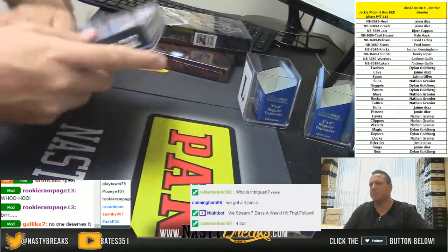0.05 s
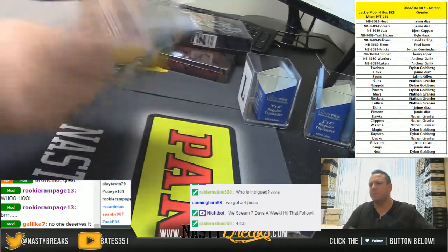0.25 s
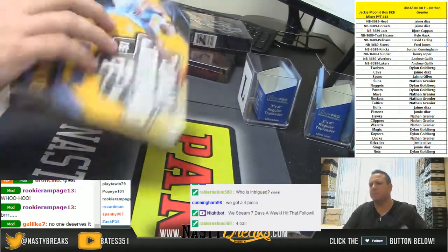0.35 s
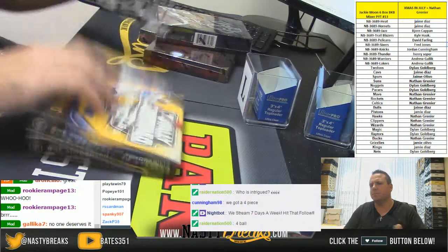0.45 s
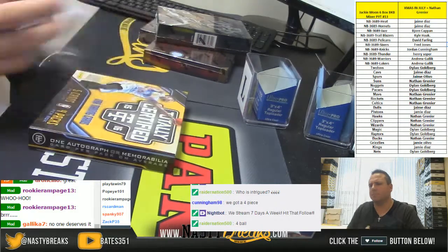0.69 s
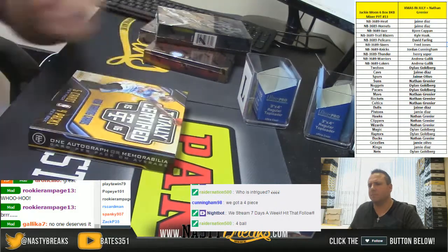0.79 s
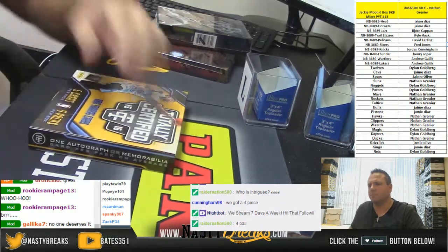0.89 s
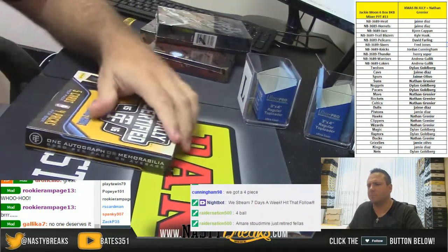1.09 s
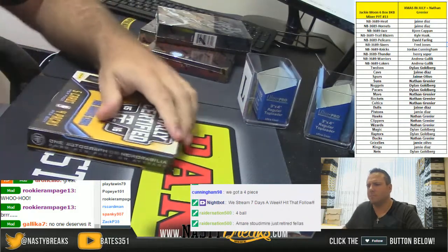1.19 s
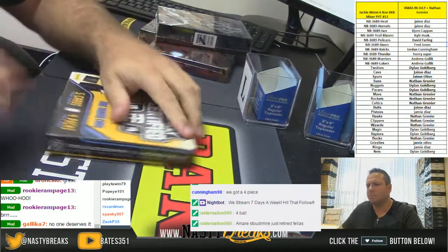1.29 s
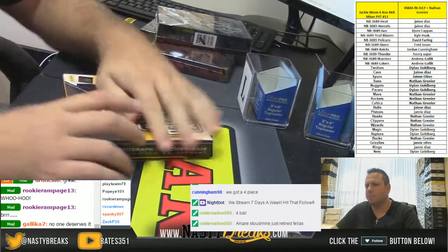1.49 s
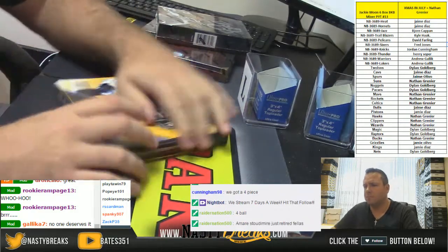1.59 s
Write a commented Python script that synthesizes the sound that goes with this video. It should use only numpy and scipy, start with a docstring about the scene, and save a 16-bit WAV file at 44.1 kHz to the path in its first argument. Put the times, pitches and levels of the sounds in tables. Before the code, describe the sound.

A flat cardboard box slaps onto a desk with a loud, overloaded thunk after brief wrap crackles and a faint whoosh; then hands rub, shuffle and tap it softly over a low machine hum, close microphone.

```python
"""A machine hums in a room while hands slide over a glossy box lid: hissing noise, with snaps of the wrap.
A hollow whoosh swells as the flat cardboard box swings down. A quarter of a second in, it slaps onto
a desk: ringing walls and cracks of noise overload the microphone, and the desk top booms in low tones.
Then hands nudge, shuffle and tap the box: soft low thumps, dull noise and very short tones.
A thin high hiss comes up near the end."""
import sys
import numpy as np
from scipy import signal
from scipy.fft import rfft, irfft
from scipy.io import wavfile

SR = 44100
rng = np.random.default_rng(int(sys.argv[2]) if len(sys.argv) > 2 else 0)


def field_ratio(decibels):
    """Amplitude ratio for a level in dB (20 dB per decade); scalars and array-likes work."""
    return 10 ** (np.asarray(decibels, dtype=float) / 20)


def transcribe(signal):
    """Save signal, clipped to [-1, 1], as a 16-bit WAV file at the path in sys.argv[1]."""
    frames = np.atleast_2d(signal).T
    limited = np.clip(frames, -1, 1)
    pcm = np.round(limited * 32767).astype(np.int16)
    wavfile.write(sys.argv[1], SR, pcm)


N = 72765   # length in samples

# machine hum that wavers, in four stretches of rows: [t/s, level/dB]
HUM_LEVEL = [
    [(0.0, -38.5), (0.076, -37.5), (0.162, -53), (0.22, -35.5)],
    [(0.45, -40), (0.518, -37.5), (0.67, -48), (0.76, -37.5)],
    [(1.0, -38.5), (1.098, -41.5), (1.144, -58), (1.19, -46)],
    [(1.36, -45), (1.388, -67), (1.426, -40.5), (1.64, -53.5)],
]
# loudness of a thin high hiss: [t/s, level/dB]
THIN_HISS_LEVEL = [(1.40, -72), (1.47, -80), (1.555, -59.5), (1.60, -67.5), (1.63, -78)]
# tone colour of the room air: [f/Hz, relative level per Hz/dB]
AIR_COLOUR = [(88, -16), (150, -3.5), (308, -16), (441, -14), (542, -22), (1390, -28.5), (1960, -33),
              (7980, -37.5), (9000, -40.5), (11700, -65.5), (19800, -120)]
# how long the room echoes at each pitch: [f/Hz, time to fall by 60 dB/s]
ROOM_DECAY = [(300, 0.22), (1000, 0.22), (3000, 0.22), (8000, 0.13), (16000, .2)]
# hollow note as the box swings down: [t/s, level/dB]
WHOOSH_LEVEL = [(.09, -55.5), (.125, -47), (.19, -48), (.225, -53.5), (.24, -64.5)]
# skin sliding on the wrap: [t/s, level/dB]
RUB_LEVEL = [(0, -50), (.035, -47), (.09, -49.5), (.15, -42.5), (.19, -48.5), (.232, -55), (.30, -49),
             (.374, -54.5), (.384, -38.5), (.412, -47), (.44, -32), (.495, -36), (.555, -39), (.578, -47.5),
             (.625, -51), (.66, -58), (.70, -56), (.715, -46.5), (.79, -51.5), (.82, -60.5), (.90, -65.5),
             (.98, -78), (1.06, -67.5), (1.11, -57), (1.17, -58.5), (1.22, -62.5), (1.31, -69),
             (1.35, -52.5), (1.40, -56.5), (1.46, -61), (1.53, -55), (1.59, -55), (1.63, -70)]
# tone colour of the sliding skin: [f/Hz, relative level per Hz/dB]
SKIN_COLOUR = [(290, -31), (500, -3), (1000, -8), (1090, -10.5), (1320, -2.5), (3140, -4), (6380, -2),
               (10400, -8.5), (14600, -10), (15900, -14.5)]
# palms shuffling the box on the mat: [t/s, level/dB]
SHUFFLE_LEVEL = [(0, -50.5), (.2, -49), (.40, -45), (.52, -44.5), (.60, -58), (.76, -58), (.785, -42.5),
                 (.83, -49.5), (.97, -55.5), (1.03, -60), (1.18, -61), (1.24, -53.5), (1.36, -51),
                 (1.46, -62), (1.52, -48.5), (1.58, -54), (1.65, -46)]
# tone colour of the shuffling: [f/Hz, relative level per Hz/dB]
MAT_COLOUR = [(180, -3), (300, -2.5), (833, -15), (1480, -12.5), (1940, -24.5), (3000, -19), (3900, -45.5),
              (6600, -120)]
# finger taps and small creaks on the lid:
# [t/s, level/dB, f/Hz, upper ring relative level/dB, lower ring relative level/dB]
FINGER_TAPS = [(0.028, -42.5, 1490, -5, 3), (0.71, -40, 2300, 2, 0.5), (0.777, -39.5, 1000, -16, 7),
               (0.785, -45.5, 1150, 5.5, -16), (0.872, -53.5, 802, 5, -20), (0.885, -40.5, 1000, -8, -16),
               (0.952, -50, 1380, -4, -11), (1.15, -45.5, 1217, -8, -7.5), (1.18, -39, 1015, -11.5, -29.5),
               (1.261, -51.5, 787, -2, 6), (1.272, -32.5, 1885, -15.5, -1.5), (1.311, -40.5, 977, -15, -13),
               (1.428, -44, 1370, -10, -6), (1.491, -46.5, 1590, -9, -8), (1.512, -46.5, 1170, -4, -13),
               (1.557, -44, 1390, -1.5, -5), (1.603, -49, 1060, -9, -13)]
# duller pats, same columns:
# [t/s, level/dB, f/Hz, upper ring relative level/dB, lower ring relative level/dB]
DULL_PATS = [(0.068, -47, 320, -15, -14), (0.777, -30.5, 490, -10.5, -16), (0.799, -51, 369, 7, -14),
             (0.845, -39, 400, -14, -13.5), (0.91, -53, 363, 6, -20), (0.957, -40, 475, -14, -25),
             (0.974, -37.5, 326, -15, -16), (1.357, -38, 446, -8.5, -17), (1.497, -37, 430, -10, -12),
             (1.518, -39.5, 346, -1.5, -19)]
# plastic wrap snapping, same columns:
# [t/s, level/dB, f/Hz, upper ring relative level/dB, lower ring relative level/dB]
WRAP_SNAPS = [(0.0377, -28, 8300, -5, -1), (0.095, -33, 5040, -5, -5), (0.1128, -35, 4140, -2, -5),
              (0.1256, -24.5, 7850, -3, -5.5), (0.365, -36.5, 6250, -4, -17),
              (0.3827, -28.5, 4590, -12, -2), (0.4378, -21, 7240, -3, -20), (0.4457, -20, 6720, -1, -21),
              (0.4701, -21.5, 8100, -3, -12), (0.6871, -37, 7700, -9, -7), (0.8841, -41, 3520, -0.5, 1),
              (1.272, -38, 3700, -5, 1), (1.491, -47, 7690, -7, -5), (1.513, -44, 4900, -5, -3),
              (1.5574, -44, 8250, 0.5, -9)]
# tones of the desk top and frame: [f/Hz, time to fall by 60 dB/s]
DESK_MODES = [(47, 0.41), (72, 0.14), (148, 0.3), (168, 0.14), (186, 0.18)]
# pushes into the desk: [t/s, then level/dB into each of the four lowest desk tones]
DESK_PUSHES = [(.250, -14.5, -4, -9.5, -2), (.268, -8.5, -15.5, 3, 3.5), (.292, -54, -8, -7, 0),
               (0.401, -28, -24.5, -35.5, -34), (0.502, -25, -44, -44, -41),
               (0.778, -13.5, -12.5, -19, -36), (.845, -13.5, -15.5, -37, -18.5),
               (.875, -10.5, -19.5, -24.5, -29), (0.989, -39, -44, -44, -30),
               (1.205, -24.5, -22, -15.5, -8.5), (1.239, -19, -33, -35, -18), (1.286, -18, -39, -56, -28.5),
               (1.371, -32, -45, -47, -33.5), (1.50, -26.5, -55, -36.5, -28.5),
               (1.550, -22.5, -20.5, -33, -29.5), (1.601, -19.5, -41, -54, -32.5)]
# desk shaken by resting hands: [t/s, level/dB]
SHAKE_LEVEL = [(0.0, -41), (0.242, -46.5), (0.41, -33.5), (0.606, -39.5), (0.78, -30.5), (0.94, -27.5),
               (1.064, -36), (1.314, -34.5), (1.466, -32.5), (1.64, -54)]
# edges and face of the box landing: [t/s, level/dB, crack level/dB, f/Hz of the wall tones struck most]
LANDINGS = [(.2413, -3, -20, 596), (0.2429, -1, -13, 620), (0.2503, 1, -6.5, 1360), (.2530, -3, -7, 650),
            (.2590, -8, -26, 550), (0.2649, -0.5, -2.5, 1200), (.2690, 4.5, -8.5, 445),
            (0.2774, -3.5, -19.5, 1084), (.2840, -17, -23, 893)]
# tones of the box walls: [f/Hz, relative level/dB, time to fall by 60 dB/s]
BOX_MODES = [(288.5, -5.5, 0.092), (355, -9.5, 0.031), (425, -9, 0.076), (509, -6, 0.025), (580, -7, 0.072),
             (695, -7.5, 0.029), (790, -13, 0.033), (994, -6.5, 0.02), (1200, -11.5, 0.018),
             (1483, -7.5, 0.019), (1865, -14, 0.02), (2176, -12.5, 0.033), (2478, -11.5, 0.015),
             (2780, -16, 0.015), (3700, -22, 0.012)]
# tone colour of the air squeezed out: [f/Hz, relative level per Hz/dB]
CRACK_COLOUR = [(180, -34), (300, -2), (440, 5), (868, -13), (1230, -2), (1890, -15.5), (5580, -23),
                (15900, -47.5)]

HUM_HZ, AIR_DB, ROOM_DB = 120.4, -52.5, -10.5
WHOOSH_HZ, WHOOSH_T60_S = (477, 590), 1.8 / 47
GRAINS_PER_S, GRAIN_SPREAD_DB = 2200, 5.5
GRAIN_SHARE = 0.17   # part of the rubbing power that is tiny slips
UPPER_RATIO, LOWER_RATIO = 1.6, 0.53   # side rings, as multiples of the main pitch
DESK_SIDE_DB = -4.5   # highest desk tone, compared with its neighbour
FOCUS_DB_PER_OCTAVE, CRACK_T60_S = -5, 0.041
CLIP_TOP, CLIP_KNEE = 0.88, 6.0   # loudest possible value; a larger knee bends more sharply


def rms_one(x):
    """Scales a sound to an average (rms) strength of 1."""
    return x / np.sqrt(np.mean(x ** 2) + 1e-20)


def gain_curve(rows):
    """Turns rows of time and dB into a smoothly changing gain."""
    s, db = np.transpose(rows)
    return field_ratio(np.interp(np.arange(N) / SR, s, db))


def at_hz(points, hz):
    """Reads a table between its rows, on a logarithmic pitch scale."""
    table_hz, value = np.array(points).T[:2]
    return np.interp(np.log(hz), np.log(table_hz), value)


def clicks(s, gain):
    """Single-sample clicks at the given seconds."""
    out = np.full(N, 1e-18)
    np.add.at(out, (np.asarray(s) * SR).astype(int), gain)
    return out


def ring(x, hz, t60):
    """A resonance: a unit click starts a sine of height 1 that falls by 60 dB in t60 seconds."""
    r = field_ratio(-60 / (t60 * SR))
    w = 2 * np.pi * hz / SR
    return signal.lfilter([0, np.sin(w)], [1, -2 * r * np.cos(w), r * r], x)


def cut(x, hz, kind, order):
    """Keeps the low, high or middle part of the spectrum."""
    return signal.sosfilt(signal.butter(order, hz, kind, fs=SR, output="sos"), x)


def drift(rate):
    """Slow random wander: straight lines between random points, rate points per second."""
    knots = rng.standard_normal(int(N / SR * 60) + 2)
    return np.interp(np.arange(N) / SR * rate, np.arange(len(knots)), knots)


def colour(x, spectrum):
    """Shapes the spectrum, then scales to rms 1."""
    hz = np.maximum(np.fft.rfftfreq(N, 1 / SR), 1)
    return rms_one(irfft(rfft(x) * field_ratio(at_hz(spectrum, hz)), N))


def background():
    """A wavering hum with a weak octave over room air, and a thin hiss of band-cut noise."""
    turn = 2 * np.pi * HUM_HZ * np.arange(N) / SR + 0.11 * drift(4.8)
    wave = np.sin(turn) + field_ratio(-24) * np.sin(2 * turn)
    hum = gain_curve(sum(HUM_LEVEL, [])) * np.sqrt(2) * wave
    thin_noise = cut(rng.standard_normal(N), (7340, 9200), "band", order=1)
    thin = gain_curve(THIN_HISS_LEVEL) * rms_one(thin_noise)
    air = field_ratio(AIR_DB + 0.8 * drift(11.8)) * colour(rng.standard_normal(N), AIR_COLOUR)
    return hum + thin + air


def room(x):
    """Diffuse echoes: octave bands of noise, each dying at its own rate."""
    age, answer = np.arange(SR // 2) / SR, 0
    for low in 250 * 2 ** np.arange(6):
        band = cut(rng.standard_normal(len(age)), [low, 2 * low], "band", order=2)
        answer = answer + band * field_ratio(-60 * age / at_hz(ROOM_DECAY, 1.4 * low))
    answer = answer * np.minimum(age / 0.0047, 1)   # echoes build up over 4.7 ms
    return signal.fftconvolve(x, answer / np.sqrt(np.sum(answer ** 2)))[:N]


def whoosh():
    """The hollow note of the swinging box: noise in two narrow resonances."""
    noise = rng.standard_normal(N)
    hollow = sum(ring(noise, hz, WHOOSH_T60_S) for hz in WHOOSH_HZ)
    return gain_curve(WHOOSH_LEVEL) * rms_one(hollow)


def grains():
    """Rubbing noise: dense tiny slips of random size over smooth hiss."""
    size_db = GRAIN_SPREAD_DB * np.minimum(rng.exponential(1, N), 5)
    sizes = field_ratio(size_db) * rng.choice([-1, 1], N)
    slips = rms_one(sizes * (rng.random(N) < GRAINS_PER_S / SR))
    return np.sqrt(GRAIN_SHARE) * slips + np.sqrt(1 - GRAIN_SHARE) * rng.standard_normal(N)


def rub():
    """Sliding skin hisses on the wrap and the box shuffles dully on the mat, both unsteady grainy noise."""
    skin = gain_curve(RUB_LEVEL) * field_ratio(1.0 * drift(40)) * colour(grains(), SKIN_COLOUR)
    shuffle = gain_curve(SHUFFLE_LEVEL) * field_ratio(1.5 * drift(38)) * colour(grains(), MAT_COLOUR)
    return skin + shuffle


def ticks(rows, cycles):
    """Each touch swells for some cycles and dies, with one ring above and one below its pitch."""
    out = np.zeros(N + SR)
    turns_per_hz = np.arange(SR // 10) / SR
    for s, db, hz, upper_db, lower_db in rows:
        turns = turns_per_hz * hz
        upper = field_ratio(upper_db) * np.sin(2 * np.pi * turns * UPPER_RATIO)
        lower = field_ratio(lower_db) * np.sin(2 * np.pi * turns * LOWER_RATIO)
        wave = np.sin(2 * np.pi * turns) + upper - lower
        swell = turns / cycles * np.exp(1 - turns / cycles)
        start = int(s * SR)
        out[start:start + len(wave)] += field_ratio(db) * swell * wave
    return out[:N]


def desk():
    """Soft pushes ring the desk tones; resting hands keep the lower ones shaking."""
    s, *db = np.transpose(DESK_PUSHES)
    db.append(db[-1] + DESK_SIDE_DB)
    # neighbouring tones start in opposite directions
    rung = sum(ring(clicks(s, (-1) ** k * field_ratio(db[k])), hz, t60)
               for k, (hz, t60) in enumerate(DESK_MODES))
    noise = rng.standard_normal(N)
    shake = ring(noise, DESK_MODES[0][0], 0.25) + ring(noise, 24, 0.25)
    shake = shake + 2.1 * ring(noise, DESK_MODES[1][0], 0.067)
    shake = shake + 0.35 * ring(noise, DESK_MODES[3][0], 0.071)
    return cut(rung + gain_curve(SHAKE_LEVEL) * rms_one(shake), 231.5, "low", order=6)


def slap():
    """Each contact rings the box walls, most of all near one pitch, and squeezes out a crack of air."""
    s, db, crack_db, focus_hz = np.transpose(LANDINGS)
    luck_db = rng.normal(0, 1.7, (len(s), len(BOX_MODES)))
    walls = 0
    for k, (hz, level_db, t60) in enumerate(BOX_MODES):
        focus_db = FOCUS_DB_PER_OCTAVE * abs(np.log2(hz / focus_hz))
        strike = (-1) ** k * field_ratio(db + level_db + luck_db[:, k] + focus_db)
        walls = walls + ring(clicks(s, strike), hz, t60)
    keep = field_ratio(-60 / (CRACK_T60_S * SR))   # share of the crack left after each sample
    fade = signal.lfilter([1], [1, -keep], clicks(s, field_ratio(crack_db)))
    return walls + fade * colour(rng.standard_normal(N), CRACK_COLOUR)


def scene():
    """Adds all sources; only the slap and the small touches get room echoes."""
    touches = ticks(FINGER_TAPS, cycles=1.21) + ticks(DULL_PATS, cycles=0.95)
    touches = touches + ticks(WRAP_SNAPS, cycles=0.88)
    near = cut(slap() + touches, 307, "high", order=2)
    mix = near + field_ratio(ROOM_DB) * room(near) + desk() + rub() + whoosh() + background()
    return mix[None]   # one channel


def roll_off(x):
    """The treble ends steeply here."""
    return signal.sosfilt(signal.butter(12, 16020, fs=SR, output="sos"), x)


def record(dry):
    """The microphone input overloads with a rather hard knee; the top of the spectrum is cut."""
    flat = dry / (1 + np.abs(dry / CLIP_TOP) ** CLIP_KNEE) ** (1 / CLIP_KNEE)
    top_cut = signal.cheby2(24, 70, 16120, fs=SR, output="sos")   # 70 dB down from 16120 Hz up
    finished = signal.sosfilt(top_cut, flat)
    return roll_off(finished)


dry = scene()
out = record(dry)
transcribe(out)
```